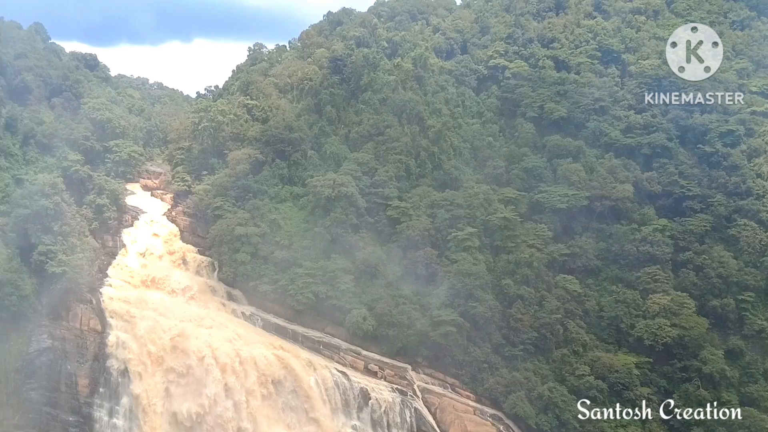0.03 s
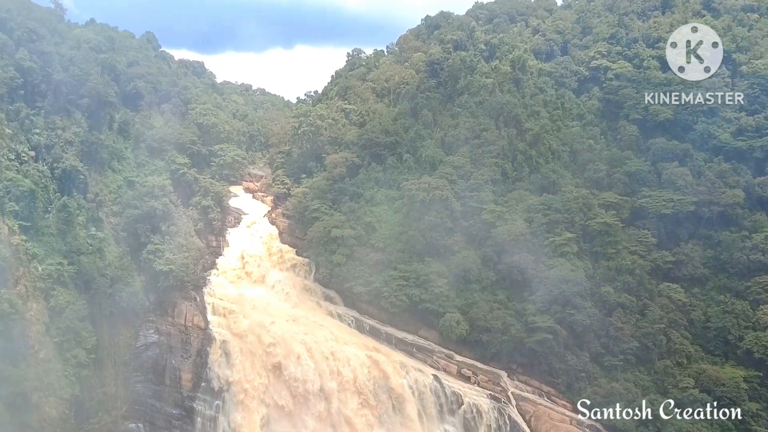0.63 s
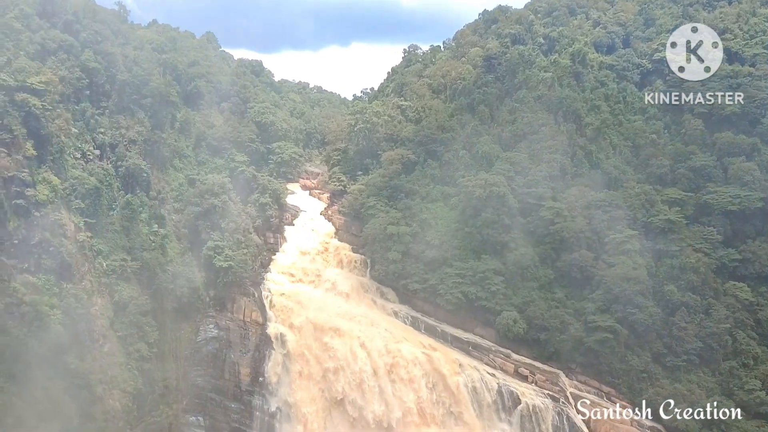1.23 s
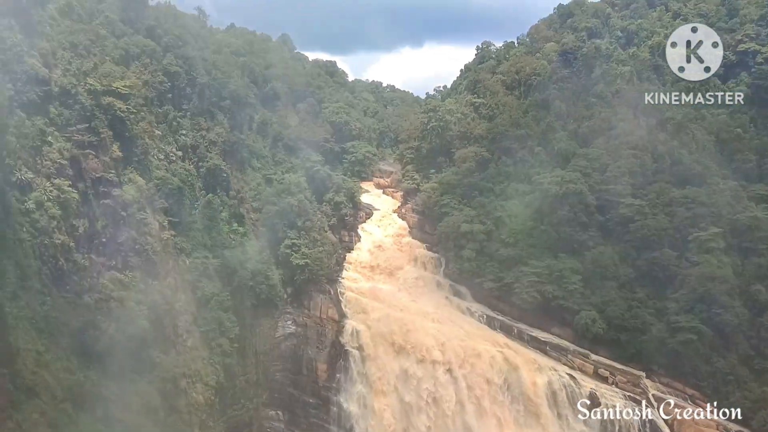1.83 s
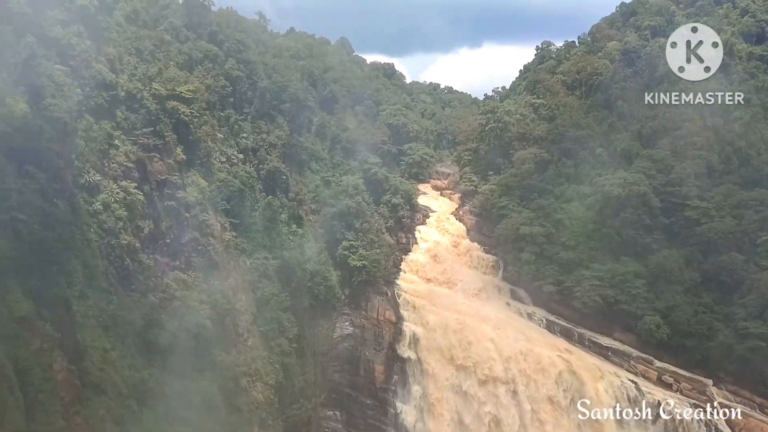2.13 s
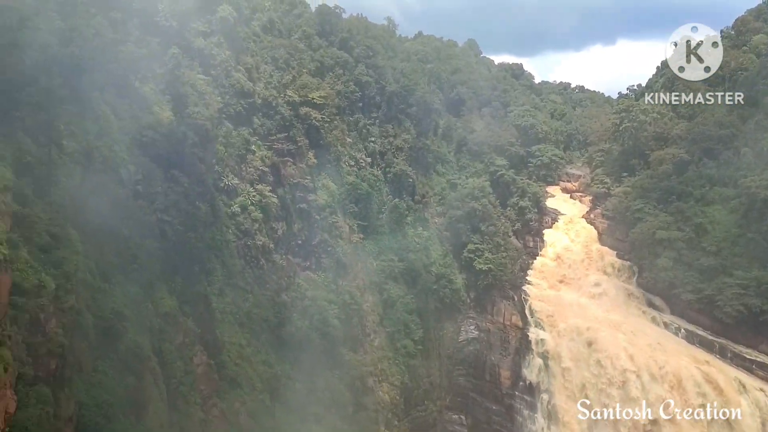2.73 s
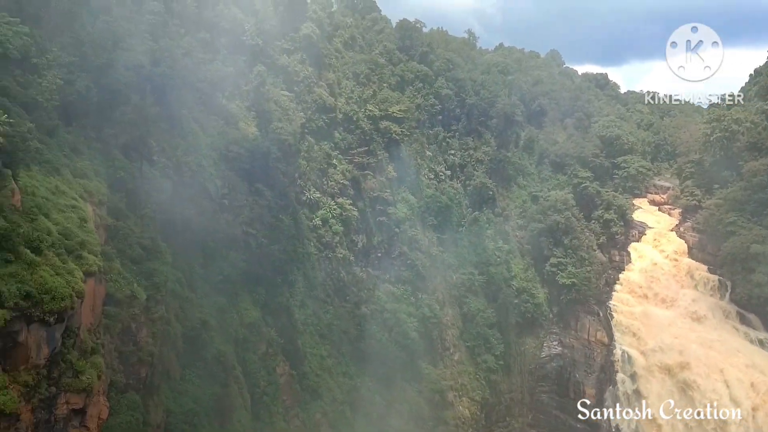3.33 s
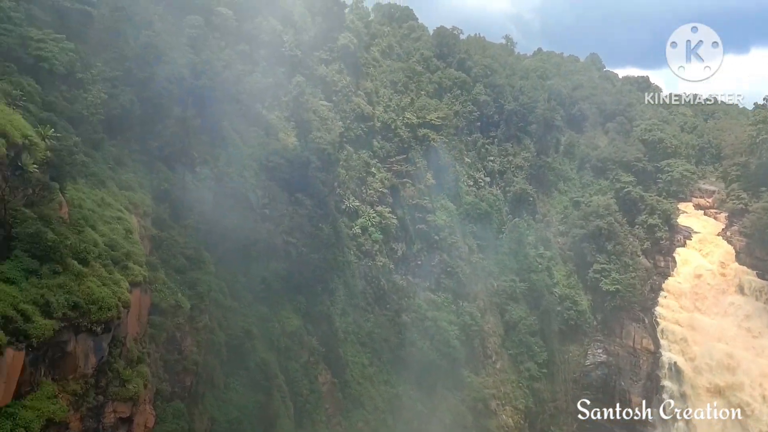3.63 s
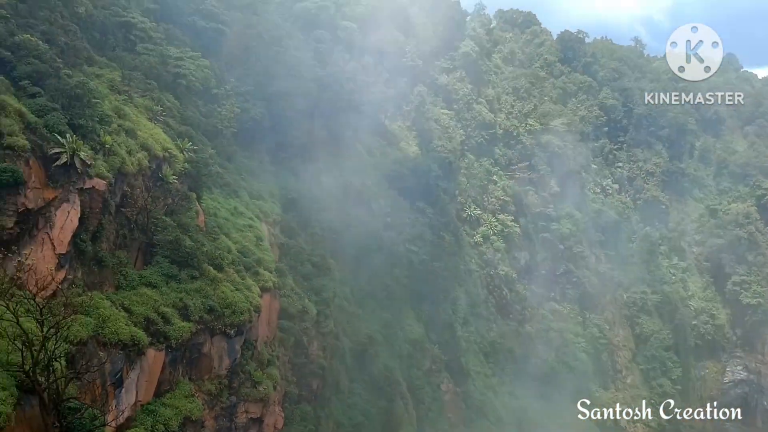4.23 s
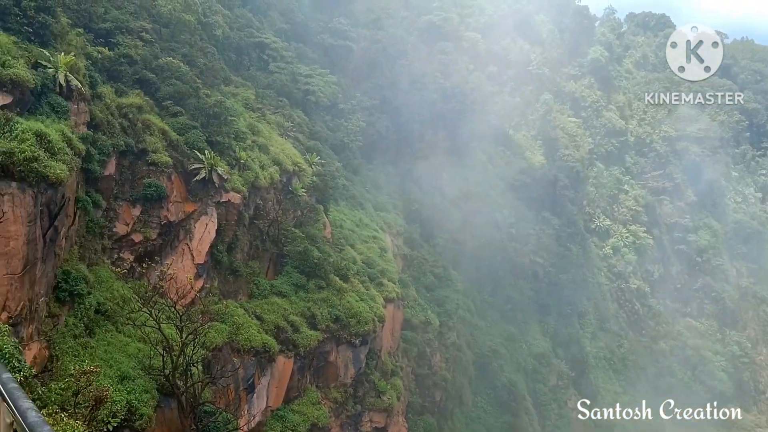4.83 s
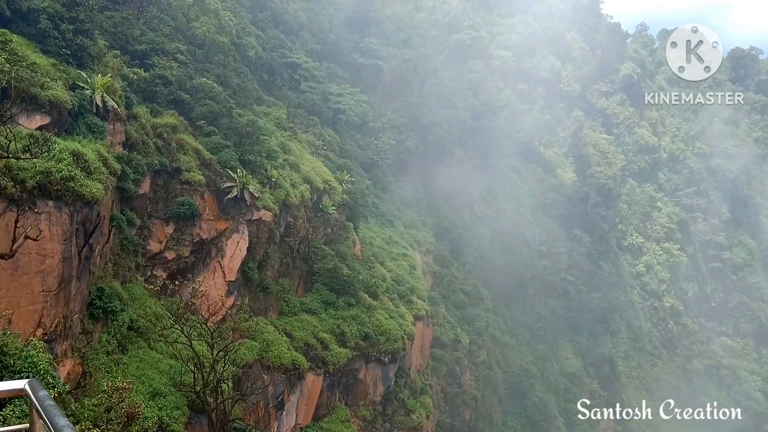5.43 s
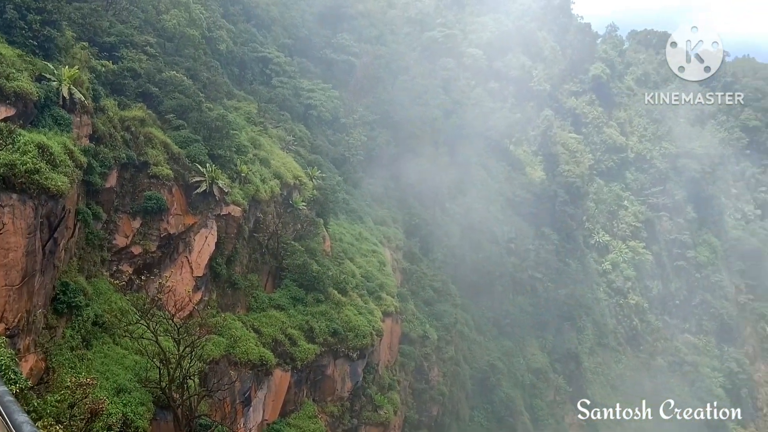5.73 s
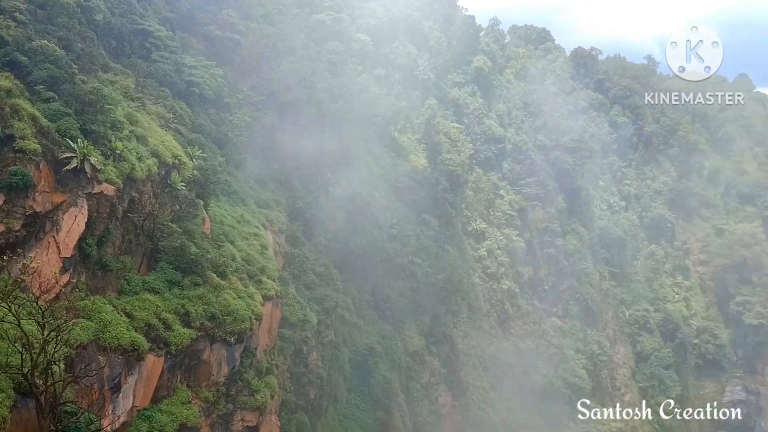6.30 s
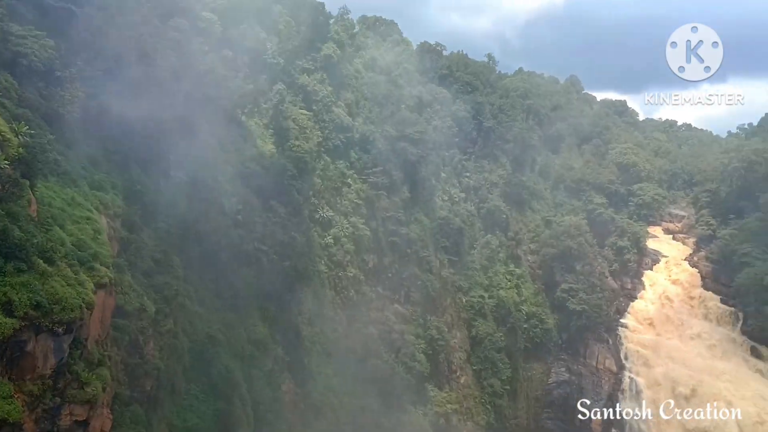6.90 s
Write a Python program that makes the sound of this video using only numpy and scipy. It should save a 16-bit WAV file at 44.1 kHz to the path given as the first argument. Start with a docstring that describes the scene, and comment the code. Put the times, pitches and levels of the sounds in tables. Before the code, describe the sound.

A large waterfall rushes from start to finish, about seven seconds, heard from a lookout across a forested gorge. The body of the sound is a full, low roar with a faint, wavering hollow tone inside it. Above it, water churns and splashes on rock, and spray merges into a softer, fluttering hiss. Underneath, masses of water thud into the pool in small uneven surges, with the strongest deep rumble at about 2 seconds. The overall level stays nearly even. The sound arrives both directly and scattered by the slopes. The hand-held microphone turns slowly away from the fall, so the rush gradually changes colour and the upper hiss leans to the right, most clearly from about 4 to 6 seconds. After 6 seconds the microphone starts turning back while the water keeps roaring.

```python
"""A lookout across a forested gorge, facing a big muddy waterfall.
Masses of water thud into the pool, clouds of bubbles roar, and countless splashes merge into a hiss.
The sound arrives directly and scattered by the slopes. A hand-held pair of microphone ports turns
slowly away from the fall and starts back, which shifts and recolours the rush."""
import sys
import numpy as np
from scipy import signal
from scipy.fft import rfft, irfft
from scipy.io import wavfile
from scipy.ndimage import uniform_filter1d, minimum_filter1d

SR = 44100
rng = np.random.default_rng(int(sys.argv[2]) if len(sys.argv) > 2 else 0)


def wrap_up_sound(samples):
    """Save the sound to the file named by the first command line argument, as 16-bit audio."""
    columns = np.atleast_2d(samples).T
    # keep every value between -1 and 1, then stretch to whole-number steps
    tamed = np.clip(columns, -1, 1)
    steps = np.round(tamed * 32767).astype(np.int16)
    wavfile.write(sys.argv[1], SR, steps)


N = 306936
HZ = np.maximum(np.arange(N // 2 + 1) * SR / N, 1)
RUMBLE_TOP_HZ, ROAR_TOP_HZ, SPLASH_TOP_HZ = 96, 474, 1800
# spectral envelope of the falling water at the lookout: f/Hz, level/dB
WATER_SPECTRUM = [(25, -31), (45, -25), (66, -12), (120, -5.5), (180, -2.5), (250, -3), (340, -3.5),
                  (520, -12.5), (760, -7), (1000, -7.5), (1500, -11.5), (2000, -17), (5200, -20),
                  (7100, -21.6), (7650, -23.5), (8400, -45)]


def from_db(db):
    """Amplitude ratio of a level in decibels."""
    return 10 ** (np.asarray(db) / 20)


def rms_one(x):
    """Normalisation to unit power."""
    return x / np.sqrt(np.mean(x ** 2) + 1e-20)


def in_time(rows):
    """Linear interpolation of each column at every sample."""
    times, *columns = np.transpose(rows)
    return [np.interp(np.arange(N) / SR, times, c) for c in columns]


def in_pitch(rows):
    """Interpolation of each column on a logarithmic frequency axis."""
    hz, *columns = np.transpose(rows)
    return [np.interp(np.log(HZ), np.log(hz), c) for c in columns]


def bumps(rows, width_s):
    """Sum of Gaussian pulses in dB, one per row of t/s, height/dB."""
    t = np.arange(N) / SR
    return sum(db * np.exp(-((t - s) / width_s) ** 2) for s, db in rows)


def below(edge_hz, order=8):
    """Low-pass power response: the share under a soft edge."""
    return 1 / (1 + (HZ / edge_hz) ** order)


def coloured(x, gain):
    """Linear filtering by multiplication of the spectrum."""
    return irfft(rfft(x) * gain, N)


def evened(x, weight, samples):
    """Division by the running RMS of the weighted spectrum removes slow chance swings."""
    power = uniform_filter1d(coloured(x[0], weight) ** 2, size=samples)
    return x / rms_one(np.sqrt(power))


def waver(rate_hz, spread_db):
    """Random amplitude modulation: the gain of an uneven flow follows low-passed noise."""
    hop, settle = 40, 2000
    pole = np.exp(-2 * np.pi * rate_hz * hop / SR)
    noise = rng.standard_normal(N // hop + settle + 2)
    slow = rms_one(signal.lfilter([1], [1, -2 * pole, pole * pole], noise)[settle:])
    return from_db(spread_db * np.interp(np.arange(N) / hop, np.arange(len(slow)), slow))


def impacts(per_s, spread_db, echo_db):
    """Shot noise: three independent streams of uneven impacts, each in a diffuse wash of echoes."""
    struck = rng.random((3, N)) < per_s / SR
    sizes = from_db(spread_db * np.minimum(rng.exponential(1, struck.shape), 4))
    hits = rms_one(struck * sizes * rng.choice([-1, 1], struck.shape))
    return rms_one(hits + from_db(echo_db) * rng.standard_normal(struck.shape))


def pool():
    """Impact noise: slabs of water thud into the pool, and each heavier mass swells the rumble."""
    # slow course of the rumble: t/s, level/dB
    plunge = [(0, -14), (1.4, -11.5), (1.7, -4.5), (2.1, 5), (2.55, -6), (3.3, -8), (4.2, -15), (4.8, -8.5),
              (5.3, -11), (6, -12), (6.96, -8)]
    # heavier masses landing: t/s, level/dB above the rumble
    surges = [(.26, 15), (.54, 10.5), (.68, 18), (.92, 14.5), (1.16, 15.5), (1.32, 10), (1.87, 5),
              (2.41, 6.5), (2.67, 11), (2.82, 11), (3.13, 13), (3.49, 13), (3.65, 11), (4.05, 11.5),
              (4.55, 12.5), (4.87, 9.5), (5.0, 9), (5.39, 13), (5.6, 6.5), (5.81, 12.5), (6.17, 16),
              (6.56, 10.5), (6.68, 8.5), (6.88, 6)]
    rumble_db, = in_time(plunge)
    water_db, = in_pitch(WATER_SPECTRUM)
    slabs = impacts(per_s=200, spread_db=3.5, echo_db=0.5)
    thuds = coloured(slabs, np.sqrt(below(RUMBLE_TOP_HZ, order=16)))
    rumble = evened(thuds, from_db(water_db), samples=4001)
    return from_db(rumble_db + bumps(surges, width_s=0.062)) * rumble


def bubble_clouds():
    """Entrained air pulsates in clouds: the largest boom and come and go, the smaller roar steadily."""
    # strength of the boom: t/s, level/dB
    boom_levels = [(0, 1), (.45, -1.7), (.63, 2.5), (.88, -1), (1.2, 1.5), (1.5, 0.5), (2.4, 2),
                   (2.72, -0.5), (3.25, 1.4), (3.6, 0.2), (3.85, -2.5), (4.1, -4), (4.35, 1.5), (5, 2),
                   (5.25, -1.5), (5.85, -0.5), (6.45, 0.5), (6.96, 1.5)]
    boom_db, = in_time(boom_levels)
    water_db, = in_pitch(WATER_SPECTRUM)
    pulses = impacts(per_s=4000, spread_db=1.5, echo_db=3.5)
    band = np.sqrt(below(ROAR_TOP_HZ) * (1 - below(RUMBLE_TOP_HZ, order=16)))
    large = below(edge_hz=190, order=16)
    boom, roar = (evened(coloured(pulses, band * share), from_db(water_db), samples=17001)
                  for share in (large, 1 - large))
    return from_db(-0.77) * (from_db(boom_db) * boom + roar)


def hollow_resonance(width_hz=34):
    """Resonance: a band of noise within the roar wanders in pitch and strength."""
    # course of the resonance: t/s, centre f/Hz, level/dB
    course = [(0, 239, 6), (.25, 255, -5), (.52, 279.3, 2.5), (.95, 226, -9), (1.4, 205, -2.5),
              (1.8, 274, 2.5), (2.1, 265.2, -6.5), (2.5, 227.6, 1.5), (2.9, 234.6, 3), (3.3, 212.7, -3.5),
              (3.75, 258.3, 1.5), (4.2, 250, -4.5), (4.6, 230.1, -0.5), (5.2, 225.1, 0), (5.6, 239.9, 2),
              (6, 235, -0.5), (6.35, 232, 1), (6.96, 254.7, 1)]
    centre_hz, level_db = in_time(course)
    flutter = coloured(rng.standard_normal((3, N)), np.sqrt(below(width_hz, order=4)))
    carrier = np.exp(2j * np.pi * np.cumsum(centre_hz - width_hz / 2) / SR)
    ringing = np.real(signal.hilbert(flutter) * carrier)
    return from_db(level_db - 26.5) * rms_one(evened(ringing, 1, samples=13001))


def splashes():
    """Impact noise of sheets shattering on rock; the low and high bands churn independently."""
    # swell of the splashing: t/s, level/dB
    swell = [(0, -1.3), (.8, -1.6), (1, -1.2), (1.7, -1), (2.35, -0.2), (2.8, -1.8), (3.4, -1.5),
             (4.3, -1.1), (4.75, -2), (5.8, -1.2), (6.25, -0.2), (6.45, -1.3), (6.96, 0.5)]
    swell_db, = in_time(swell)
    sheets = impacts(per_s=4000, spread_db=4.5, echo_db=1.0)
    band = np.sqrt(below(SPLASH_TOP_HZ) * (1 - below(ROAR_TOP_HZ)))
    low = below(edge_hz=1170)
    churn = sum(coloured(sheets, band * share) * waver(rate_hz=5, spread_db=0.74)
                for share in (low, 1 - low))
    return from_db(swell_db) * churn


def spray():
    """Incoherent addition: countless drops patter and burst, merging into a fluttering hiss."""
    # the treble brightens and dulls: t/s, level/dB
    brightness = [(0, -0.5), (1.499, 0.5), (3.2, -1.4), (4.3, -0.5), (5.4, 1), (6.1, 0.3), (6.685, -1.1),
                  (6.715, -3), (6.78, -1.5), (6.96, -2)]
    treble_db, = in_time(brightness)
    drops = impacts(per_s=7000, spread_db=3.0, echo_db=1.0) * waver(rate_hz=13, spread_db=0.48)
    hiss = coloured(drops, np.sqrt(1 - below(SPLASH_TOP_HZ)))
    treble = coloured(hiss, 1 - below(edge_hz=4300))
    return from_db(-1.78) * (hiss + (from_db(treble_db) - 1) * treble)


def port(rows, turn):
    """Directivity: the peaks and notches in a port's gain slide as it turns."""
    facing, turned = np.hsplit(np.array(rows), 2)
    gain_db, = in_pitch(facing + turn * (turned - facing))
    return from_db(gain_db)


def across_gorge(spectra, turn):
    """Scattering and diffraction: long waves reach both ports alike, short ones differ between them."""
    # field at the ports: f/Hz, then scattered-to-direct level/dB, left lead/rad (facing; turned away)
    field = [(30, -14.5, 0, -13.5, -.8), (70, -20.5, -0.15, -20.5, 0.1), (200, -25.5, 0, -22, 0.26),
             (330, -18.5, -.05, -18.5, 0.3), (526, -8, -.15, -4, 0.77), (790, -15.5, -0.67, -7, 1),
             (1070, -6.5, -0.35, -4.5, 0.95), (1240, -0.5, -0.87, 0.5, 1.5), (1450, -3.5, -1.6, -1, 2),
             (1720, 6, 0.073, -3.5, 1.36), (2090, 15, 1.2, 1, 2.5), (2330, 1.5, 0.82, 7, -0.1),
             (2670, 1, -0.96, -6.5, -0.95), (3270, 9.5, -1.3, 0, -.5), (4200, 10.5, -1.1, 5.5, 2.5),
             (5200, 6, -1.7, 7, 0.2), (6150, 7.5, 1.1, 5, 2), (8000, 8, 1.4, 11, 5.5)]
    # response of each port: f/Hz, level/dB facing the fall; f/Hz, level/dB turned away
    left_response = [(120, 0, 120, -0.9), (235, -0.4, 170, 0.1), (320, 1.1, 320, -1), (430, 0, 410, 1),
                     (550, .8, 500, 1.7), (760, 1, 720, 1.2), (1200, -.5, 1400, -1.1), (1430, 4, 1450, 1.5),
                     (1840, -0.5, 1880, -1.5), (2110, -6, 2030, -2), (2400, -7, 2300, -8.5),
                     (2920, -18, 2430, -14), (3200, -10, 2680, -7), (3400, -6.3, 2800, -11.5),
                     (4050, -0.1, 4000, -7), (4400, -0.3, 4600, -6), (5120, 4.5, 5600, 1),
                     (6500, -6, 6000, 0), (7200, -2, 6400, -0.4)]
    right_response = [(120, -0.5, 120, -1.6), (235, -0.6, 270, -1.2), (320, 0, 380, -0.5),
                      (430, -0.5, 400, 1.2), (530, -1.1, 530, 2.8), (730, -0.5, 660, -3),
                      (1050, -2.5, 1200, 0), (1230, -7, 1100, -1), (1450, 1, 1460, 0.4),
                      (1790, -3, 2000, 2), (2000, 0, 2100, 5), (2270, -5, 2340, .5), (2750, .5, 2700, 7),
                      (3470, -2.5, 3500, 4.5), (3900, -0.7, 3800, 7), (5470, -2, 5150, 2.2),
                      (6300, -12, 6800, -11.5), (7700, -6.5, 7600, -5)]
    facing, turned = np.reshape(in_pitch(field), (2, 2, -1))
    scatter_db, lead = facing + turn * (turned - facing)
    scatter = from_db(scatter_db)
    direct, diffuse_left, diffuse_right = spectra
    left = (direct + scatter * diffuse_left) * port(left_response, turn ** 2.1)  # shadowed late in the turn
    right = (direct * np.exp(-1j * lead) + scatter * diffuse_right) * port(right_response, turn)
    return irfft(np.array([left, right]) / np.sqrt(1 + scatter ** 2), N)


def turning_microphone(spectra, headings):
    """Rotation as a linear cross-fade through a fan of headings."""
    # heading: t/s, turn (0 facing the fall, 1 turned to the cliff)
    path = [(0, 0.029), (.8, 0.088), (1.7, 0.22), (2.4, 0.39), (3.1, 0.57), (3.9, 0.78), (4.7, 0.87),
            (5.4, 0.97), (6.1, 0.95), (6.95, 0.71)]
    turn, = in_time(path)
    position = np.clip(turn, 0, 1) * (headings - 1)
    return sum(np.maximum(1 - np.abs(position - k), 0) * across_gorge(spectra, k / (headings - 1))
               for k in range(headings))


def limiter(x, ceiling_db, release_db_per_s):
    """Peak limiting: a tall crest ducks both channels, then the gain creeps back."""
    peak_db = 20 * np.log10(np.abs(x).max(axis=0) + 1e-9)
    over_db = np.maximum(peak_db - ceiling_db, 0)
    ramp = release_db_per_s * np.arange(N) / SR
    duck_db = np.maximum.accumulate(over_db + ramp) - ramp
    return x * from_db(uniform_filter1d(minimum_filter1d(-duck_db, size=65), size=65))


def scene():
    """Superposition: the water's sounds add, share one spectral envelope and reach the turning ports."""
    # the whole rush dips briefly: t/s, depth/dB
    dips = [(.43, 0.8), (.74, 1.7), (1.75, 2.1), (2.15, 4), (3.02, 0.5), (4.75, 1.3), (5.14, 1.8),
            (5.85, 1.5), (6.44, 0.8), (6.72, 1.5)]
    water_db, = in_pitch(WATER_SPECTRUM)
    water = pool() + bubble_clouds() + hollow_resonance() + splashes() + spray()
    water *= from_db(-bumps(dips, width_s=0.02))
    return turning_microphone(rfft(water) * from_db(water_db), headings=5)


def record(dry):
    """Peak and band limiting: crests are held down and the top is cut steeply."""
    held = limiter(dry * from_db(.2), ceiling_db=-7.7, release_db_per_s=30)
    low_pass = signal.ellip(10, .1, 90, 8500, fs=SR, output="sos")
    return signal.sosfilt(low_pass, held)


dry = scene()
out = record(dry)
wrap_up_sound(out)
```